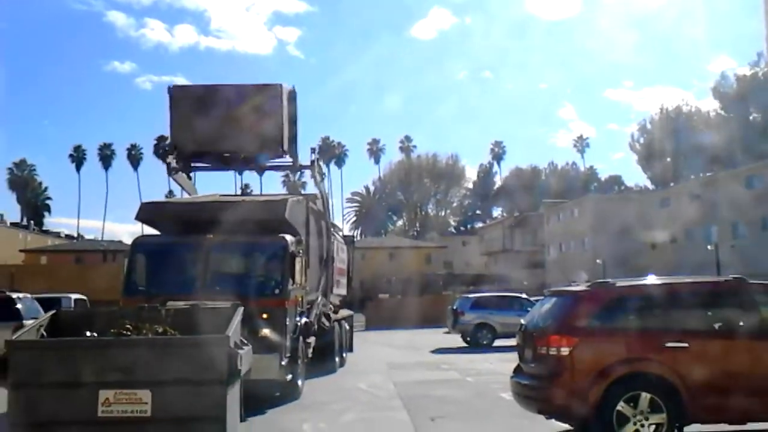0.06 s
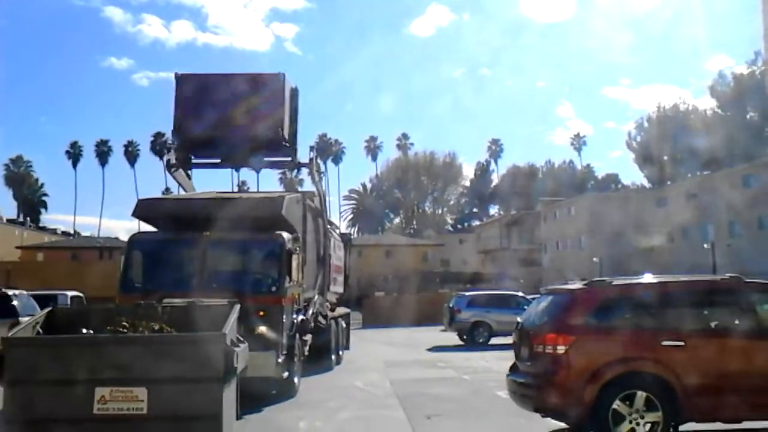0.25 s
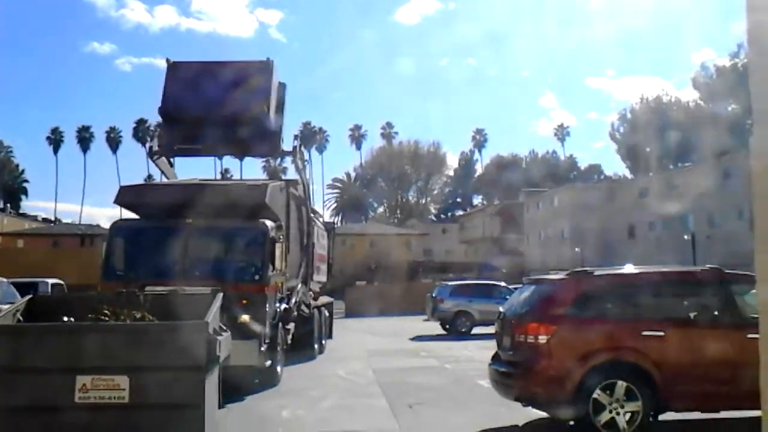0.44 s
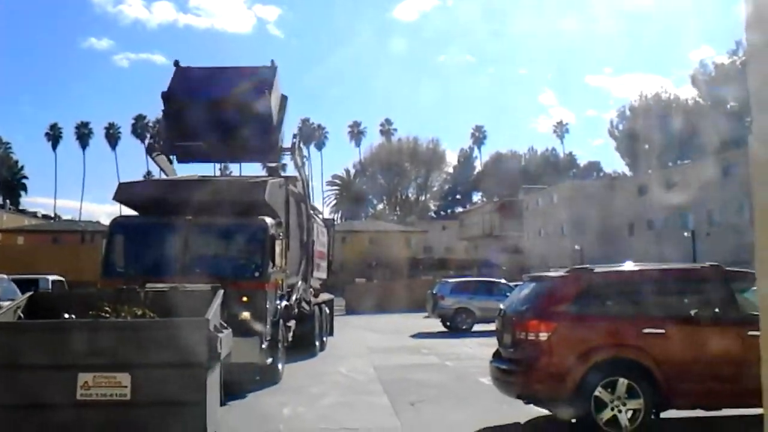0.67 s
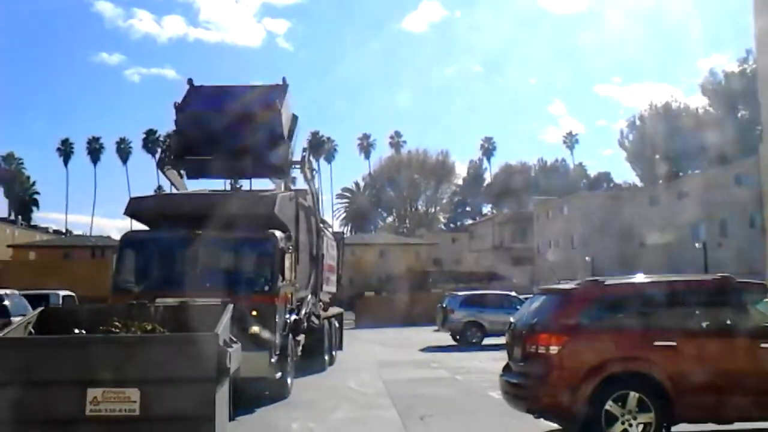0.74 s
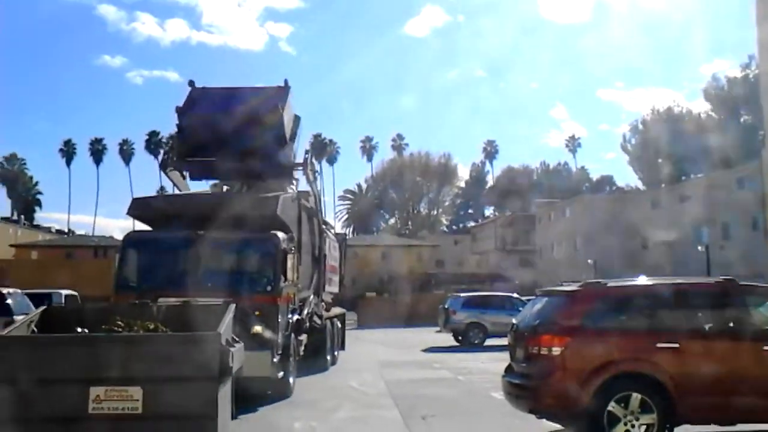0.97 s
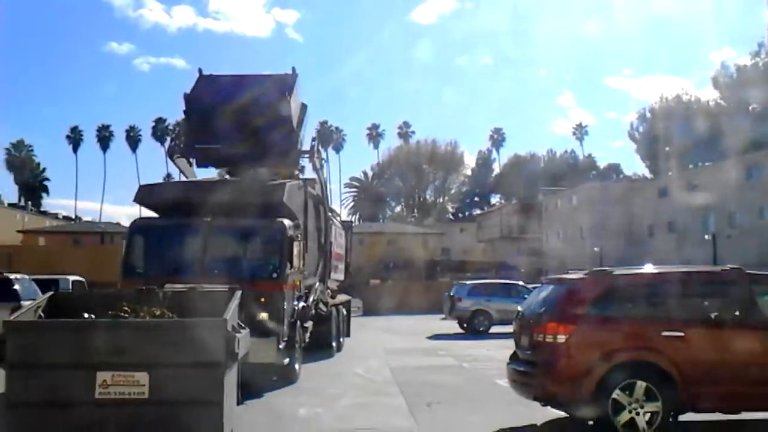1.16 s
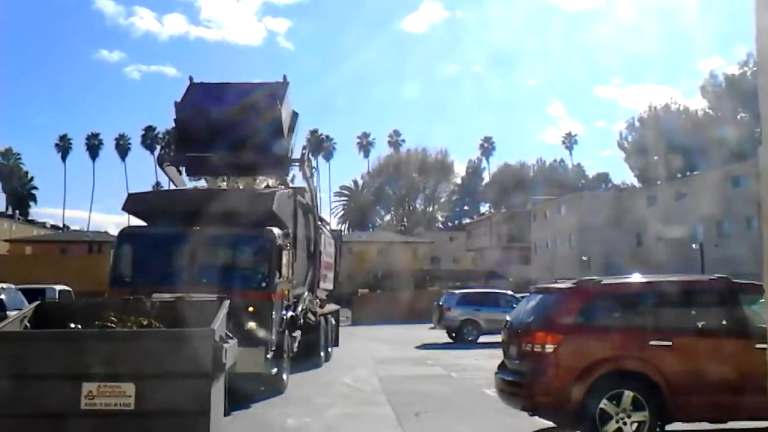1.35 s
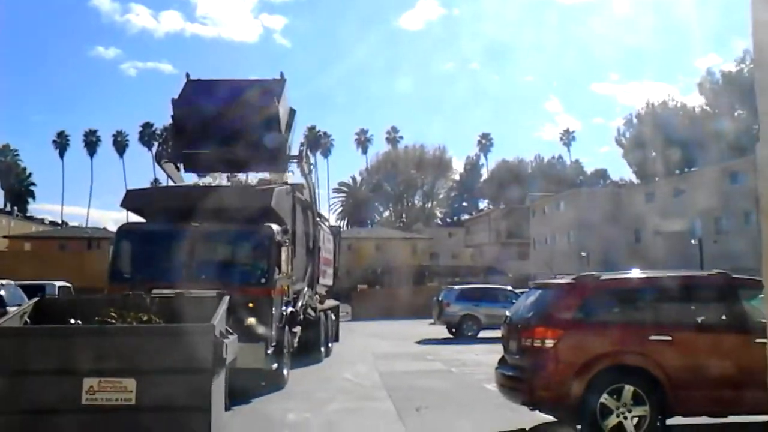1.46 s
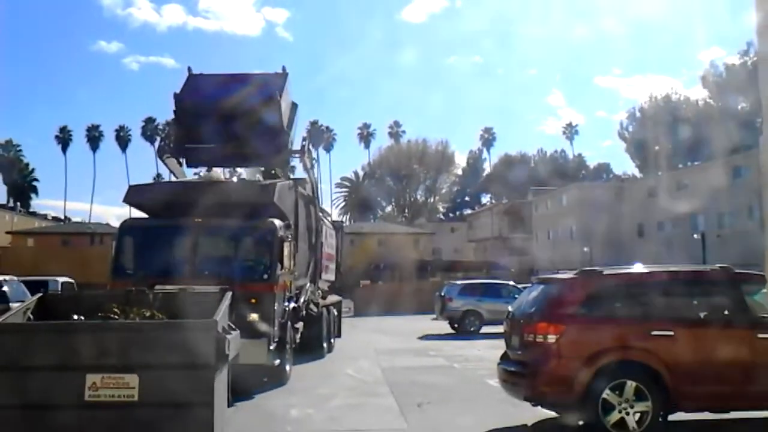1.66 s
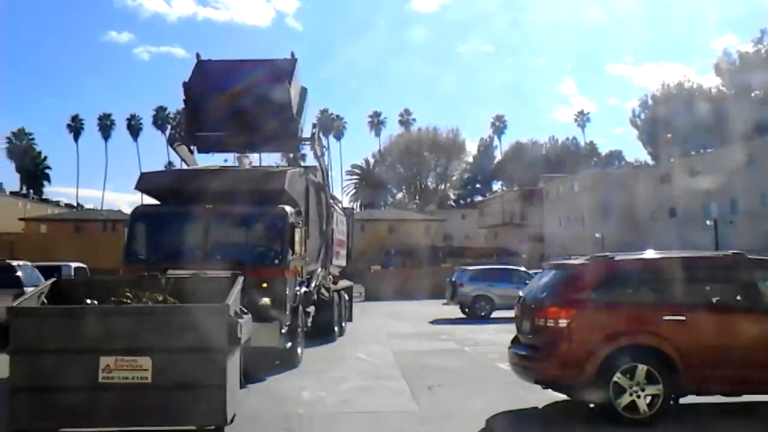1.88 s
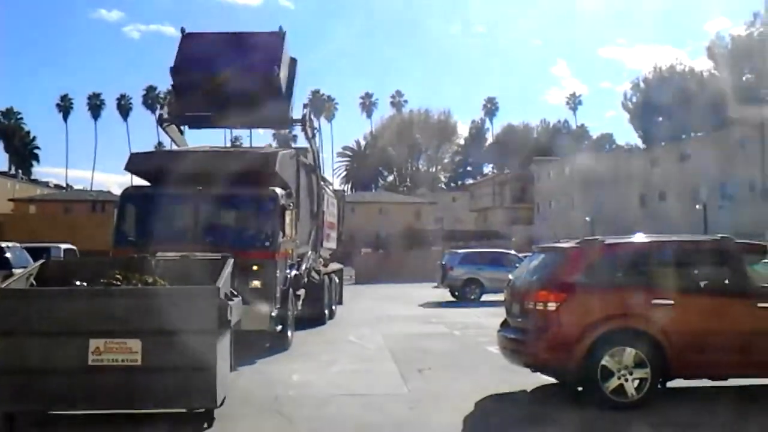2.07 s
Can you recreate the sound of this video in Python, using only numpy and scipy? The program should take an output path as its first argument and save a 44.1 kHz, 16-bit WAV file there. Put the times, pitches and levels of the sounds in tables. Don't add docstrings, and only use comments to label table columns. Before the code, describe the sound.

A garbage truck empties a steel dumpster in an open car park. Its rough diesel revs, easing down to a low idle by 0.5 s. From about 0.53 s the load slides out in dense clatter with bright metal and glass clinks. Hollow booms and metallic groans swell around 1.1-1.6 s, more rattles come near 1.7 s, and a last clank at 2.1 s. Short echoes, dull small microphone.

```python
import sys
import numpy as np
from scipy import signal
from scipy.fft import rfft, irfft
from scipy.io import wavfile
from scipy.ndimage import uniform_filter1d

SR = 44100
rng = np.random.default_rng(int(sys.argv[2]) if len(sys.argv) > 2 else 0)


def natural_amplitude(level_db):
    exponent = np.asarray(level_db, float) / 20
    return 10 ** exponent


def pcm_store(signal):
    levels = np.round(np.clip(np.atleast_2d(signal), -1, 1) * 32767)
    wavfile.write(sys.argv[1], SR, levels.astype(np.int16).T)


N = 93800


def rms_one(x):
    return x / np.sqrt(np.mean(x ** 2) + 1e-20)


def in_time(rows):
    return np.interp(np.arange(N) / SR, *np.transpose(rows))


def colour(x, points, peaks=()):
    hz = np.maximum(np.fft.rfftfreq(N, 1 / SR), 1)
    point_hz, point_db = np.transpose(points)
    db = np.interp(np.log(hz), np.log(point_hz), point_db)
    for peak_hz, width_hz, peak_db in peaks:
        db = db + peak_db / (1 + (2 * (hz - peak_hz) / width_hz) ** 2)
    return irfft(rfft(x) * natural_amplitude(db), N)


def drift(rate_hz):
    r = np.exp(-80 * np.pi * rate_hz / SR)
    noise = rng.standard_normal(N // 40 + 2002)
    slow = signal.lfilter([1], [1, -2 * r, r * r], noise)[2000:]
    return np.interp(np.arange(N) / 40, np.arange(len(slow)), rms_one(slow - slow.mean()))


def resonance(x, hz, width_hz):
    r = np.exp(-np.pi * max(width_hz, 1) / SR)
    feed = np.array([1, 0, -1]) * (1 - r * r) / 2
    back = [1, -2 * r * np.cos(2 * np.pi * hz / SR), r * r]
    return signal.lfilter(feed, back, x + 1e-18)


def grains(per_s, spread_db):
    size_db = spread_db * np.minimum(rng.exponential(1, N), 4)
    sizes = natural_amplitude(size_db) * rng.choice([-1, 1], N)
    return rms_one(sizes * (rng.random(N) < per_s / SR))


# time_s, firing_hz
FIRING = [
    (0, 70.5),
    (.25, 64.1),
    (.5, 56),
    (.8, 55.9),
    (2.13, 56),
]
CYLINDER_DB = [-6.5, -5, -1.5, -1, 0, -1.5]
# freq_hz, density_db_per_hz
ENGINE_SPECTRUM = [(30, -43.5), (60, -9.5), (130, -8), (360, -7.5), (708, -7.5), (1660, -23), (2300, -25.5),
                   (5200, -20.5)]
# freq_hz, width_hz, gain_db
ENGINE_PEAKS = [(161.7, 34, 4.5), (514, 36, 5.5), (718, 25, 8), (894, 41, 6.5), (1075, 40, 10.5),
                (1493, 50, 7), (2964, 200, 6), (585, 45, -12), (5340, 36, 4)]


def engine():
    roar_db, rev_db_per_hz, exhaust_db = -31, 0.21, -56
    knock_share = 0.083
    firing_hz = in_time(FIRING)
    turns = np.cumsum(firing_hz) / SR
    cylinder = turns.astype(int) % 6
    knock = natural_amplitude(np.array(CYLINDER_DB))[cylinder] * np.exp(-3.0 * (turns % 1))
    pulse = 1 - knock_share + knock_share * rms_one(knock)
    roar = colour(rng.standard_normal(N) * pulse, ENGINE_SPECTRUM, ENGINE_PEAKS)

    low = signal.sosfilt(signal.butter(2, 1400, fs=SR, output="sos"), roar)
    high = roar - low
    roar = low * natural_amplitude(drift(3.6)) + high * natural_amplitude(drift(3.2))

    first = np.sin(2 * np.pi * turns) * natural_amplitude(7.5 * drift(2.5))
    second = 0.5 * np.sin(4 * np.pi * turns + 1) * natural_amplitude(4.3 * drift(1.7))
    rev_db = rev_db_per_hz * (firing_hz - np.min(FIRING, axis=0)[1])
    return natural_amplitude(roar_db + rev_db) * rms_one(roar) + natural_amplitude(exhaust_db) * (first + second)


# time_s, level_db
PANEL = [(0.3, -52), (0.492, -50), (0.574, -36.5), (0.66, -39.5), (0.782, -27), (1.148, -33.5),
         (1.184, -32), (1.21, -55), (1.302, -36), (1.356, -37), (1.398, -37), (1.612, -40), (1.866, -26.5),
         (1.916, -31.5), (1.958, -51), (2.127, -35.5)]


def panel():
    mode_hz, wander_hz, rough_share = 55.5, .6, .15
    phase = 2 * np.pi * np.cumsum(mode_hz + wander_hz * drift(12)) / SR
    rough = rms_one(resonance(rng.standard_normal(N), mode_hz, 48.0))
    return natural_amplitude(in_time(PANEL)) * (np.sqrt(2) * np.sin(phase) + rough_share * rough)


def driven_mode(rows, hz, width_hz, db):
    ring = resonance(resonance(rng.standard_normal(N), hz, width_hz), hz, width_hz)
    ring = rms_one(ring)
    ring = ring / np.sqrt(0.15 + uniform_filter1d(ring ** 2, size=1500))
    rows = [(rows[0][0] - .05, -70)] + list(rows) + [(rows[-1][0] + .05, -70)]
    return natural_amplitude(in_time(rows) + db) * rms_one(ring)


# time_s, level_db
BOOM = [
    (0.55, -37),
    (0.612, -36),
    (1.282, -28),
    (1.52, -41.5),
    (1.554, -25.5),
    (1.59, -40),
    (1.742, -33.5),
    (1.782, -35.5),
    (1.9, -37),
]


def panel_boom():
    return driven_mode(BOOM, hz=106, width_hz=33.6, db=-1.5)


# time_s, level_db
GROAN = [
    (1.05, -50),
    (1.078, -51),
    (1.132, -18.5),
    (1.194, -58),
    (1.228, -27),
    (1.362, -27.5),
    (1.398, -19.5),
    (1.604, -37),
    (1.7, -33.5),
]


def hopper_groan():
    lower = driven_mode(GROAN, hz=357.3, width_hz=17, db=-2.5)
    upper = driven_mode(LANDING, hz=490, width_hz=17, db=-12)
    return lower + upper


# time_s, level_db
LANDING = [(0.5, -41.5), (0.524, -48), (0.624, -30), (0.738, -43.5), (0.762, -23.5), (0.83, -26.5),
           (0.876, -28.5), (1.064, -29), (1.234, -19), (1.426, -27.5), (1.556, -32.5), (1.828, -31.5),
           (1.924, -46), (1.944, -26.5), (1.986, -42), (2.0, -55)]
# freq_hz, level_db, t60_s
HOPPER_MODES = [(157.2, -10.5, 0.18), (210.2, -12, 0.28), (248.1, -6.5, 0.14), (292, -3.5, 0.18),
                (335, -0.5, 0.2), (393.6, -6, .12), (444, -4, 0.29), (481.6, -4.5, 0.17),
                (508.6, -5.5, 0.21), (538, -9.5, 0.071), (700, -22, 0.14)]


def hopper():
    landings_per_s, level_db, floor_db = 270, -2.5, -38.0
    power = natural_amplitude(2 * in_time(LANDING)) - natural_amplitude(2 * floor_db)
    push = np.sqrt(np.maximum(power, 1e-9))
    out = 0
    for hz, db, t60_s in HOPPER_MODES:
        hits = grains(landings_per_s, spread_db=3.5) * push
        width_hz = 2.16 / t60_s
        out = out + natural_amplitude(db) * resonance(hits, hz, width_hz) * np.sqrt(SR / width_hz)
    return natural_amplitude(level_db - 10.5) * out


# start_s, pitch_hz, peak_db,
# t60_s
CLINKS = [(.540, 2970, -34.5, 0.11), (.542, 5190, -34, 0.055), (0.584, 1120, -39, 0.084),
          (.616, 4460, -26, 0.067), (.618, 5000, -34, 0.053), (.650, 4944, -16.5, 0.033),
          (.652, 4450, -27, 0.044), (.655, 3700, -27, 0.071), (.773, 3700, -21, 0.04),
          (.778, 2530, -27, 0.033), (.762, 298.4, -21, 0.19), (.822, 5100, -28, 0.05),
          (.953, 5190, -31, 0.056), (1.05, 3700, -30.5, 0.069), (1.06, 1133, -23, 0.07),
          (1.135, 5670, -23.5, 0.04), (1.200, 1952, -28.5, 0.08), (1.201, 4520, -27, 0.064),
          (1.202, 3000, -29, 0.053), (.765, 448, -23.5, 0.16), (1.69, 1900, -42, 0.087),
          (1.745, 830, -23, 0.063), (2.092, 3700, -27.5, 0.067), (2.10, 846, -26, 0.11)]


def clinks():
    rise_s = .004
    start_s, pitch_hz, peak_db, t60_s = np.transpose(CLINKS)[:, :, None]
    age_s = np.maximum(np.arange(N) / SR - start_s, 0)
    phase = 2 * np.pi * pitch_hz * age_s
    pair = np.sin(phase) + 0.46 * np.sin(1.017 * phase + 1)
    envelope = natural_amplitude(peak_db - 60 * age_s / t60_s) * np.minimum(age_s / rise_s, 1)
    return np.sum(envelope * pair, axis=0)


# start_s, bright_db, dull_db, t60_s
CLATTER = [(0.5347, -24.5, -32.5, 0.37), (0.5752, -26, -22.5, 0.37), (0.614, -20.5, -22.5, 0.25),
           (0.6505, -19, -38, 0.15), (0.6894, -24, -46, 0.25), (0.7574, -20.5, -20, 0.083),
           (0.7741, -18, -18, 0.29), (0.8182, -21.5, -21.5, 0.15), (0.87, -40, -41, 0.25),
           (0.9533, -26, -29, 0.13), (1.037, -21, -22, 0.29), (1.064, -23, -26, 0.14),
           (1.134, -36, -30.5, 0.75), (1.1987, -23, -24, 0.29), (1.2507, -24.5, -24, 0.23),
           (1.288, -24.5, -29.5, 0.3), (1.4275, -28, -37, 0.21), (1.666, -34.5, -48, 0.23),
           (1.6858, -24, -32, 0.28), (1.719, -29, -29.5, 0.15), (1.7453, -31, -30, 0.39),
           (2.0872, -22.5, -31.5, 0.33)]
# freq_hz, width_hz, level_db
BIN_WALL = [(347, 180, -4.5), (452, 89, -10.5), (762, 107, 2), (830, 150, -3.5), (880, 100, -4.5),
            (1064, 60, -3.5), (1132, 24, -7), (1432, 43, -15)]
# freq_hz, width_hz, level_db
FITTINGS = [(1806, 200, -8.5), (2250, 220, -17.5), (2592, 50, -9), (2960, 55, -9), (3350, 43, -8.5),
            (3770, 83, -9), (4060, 73, -6.5), (4645, 330, -2), (5030, 33, -7), (5400, 450, -7.5),
            (6070, 77, -4), (7200, 650, -3.5)]
# freq_hz, density_db_per_hz
CRUNCH = [(700, -37), (1300, 5), (2200, -1), (3200, -3), (5000, 5), (7500, 5.5)]


def clatter():
    attack_s, bright_faster = .011, 1.18
    bright_gain_db, dull_gain_db, crunch_db, strike_spread_db = -7, -0.5, 3, 2.5
    modes = BIN_WALL + FITTINGS
    strike = rng.uniform(-2.36, 0.74, (len(CLATTER), len(modes)))
    strike_db = strike_spread_db * strike
    start_s, bright_db, dull_db, t60_s = np.transpose(CLATTER)[:, :, None]
    bright_db = bright_db[:, 0] + bright_gain_db
    dull_db = dull_db[:, 0] + dull_gain_db

    age_s = np.arange(N) / SR - start_s
    decay_db = -2 * 60 * np.maximum(age_s, 0) / t60_s
    dull_power = np.clip(age_s / attack_s + .5, 0, 1) ** 2 * natural_amplitude(decay_db)
    bright_power = dull_power * natural_amplitude((bright_faster - 1) * decay_db)

    out = 0
    for k, (hz, width_hz, db) in enumerate(modes):
        if k < len(BIN_WALL):
            level_db, power = dull_db, dull_power
        else:
            level_db, power = bright_db, bright_power
        envelope = np.sqrt(natural_amplitude(2 * (level_db + strike_db[:, k])) @ power)
        hits = grains(800, spread_db=2.5) * envelope
        out = out + natural_amplitude(db - 11) * resonance(hits, hz, width_hz) * np.sqrt(SR / width_hz)

    envelope = np.sqrt(natural_amplitude(2 * bright_db) @ bright_power)
    crunch = rms_one(colour(grains(3000, spread_db=2.5), CRUNCH))
    return out + natural_amplitude(crunch_db) * crunch * envelope


# delay_s, level_db
ECHOES = [(.023, -8.5), (.041, -16), (.067, -5.5), (.098, -6), (.14, -7)]


def car_park(x):
    dull, out = signal.lfilter([.4], [1, -.6], x), x.copy()
    for delay_s, db in ECHOES:
        lag = int(delay_s * SR)
        out[lag:] += natural_amplitude(db) * dull[:N - lag]
    return out


def scene():
    truck = engine() + panel()
    plates = panel_boom() + hopper_groan()
    load = hopper() + clinks() + clatter()
    return (truck + plates + car_park(load))[None]


def low_pass(x):
    return signal.sosfilt(signal.butter(12, 8780, fs=SR, output="sos"), x)


# freq_hz, gain_db
MIC_TOP = [(5300, -0.5), (5700, -11), (7200, -19), (7700, -29), (8500, -41.5), (8900, -38), (9150, -75)]


def record(dry):
    bass_cut = signal.butter(4, 44, "high", fs=SR, output="sos")
    mix = signal.sosfilt(bass_cut, colour(dry[0], MIC_TOP))
    return low_pass(mix[None])


dry = scene()
out = record(dry)
pcm_store(out)
```